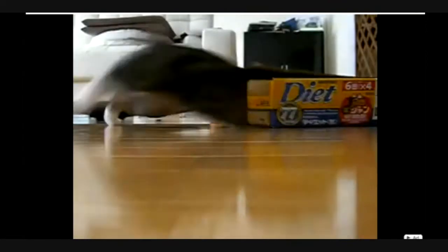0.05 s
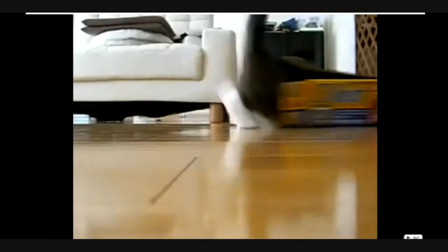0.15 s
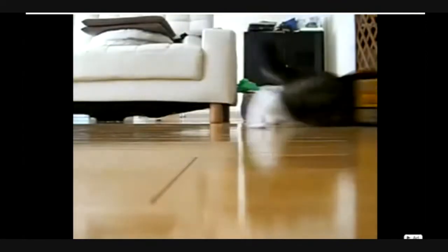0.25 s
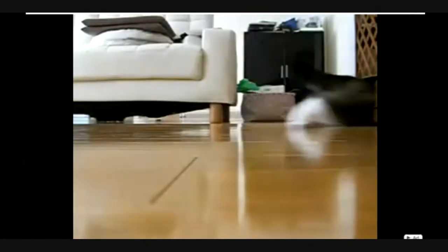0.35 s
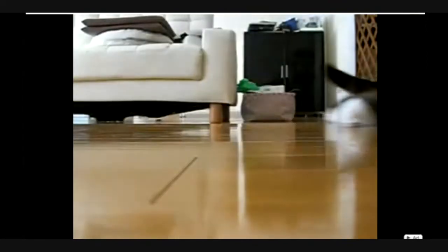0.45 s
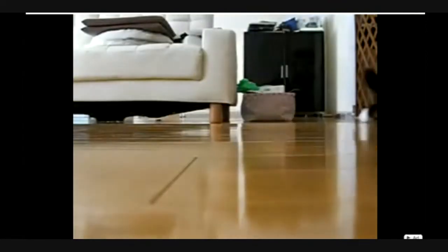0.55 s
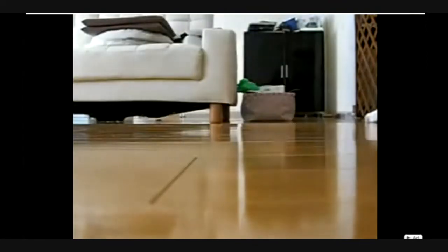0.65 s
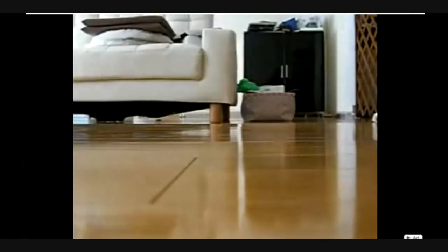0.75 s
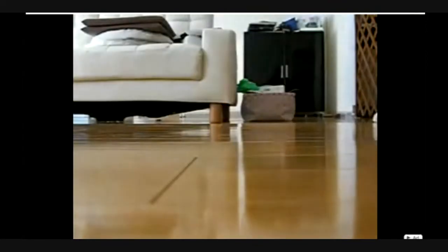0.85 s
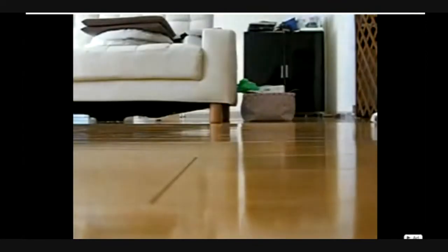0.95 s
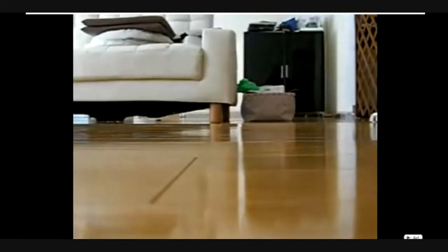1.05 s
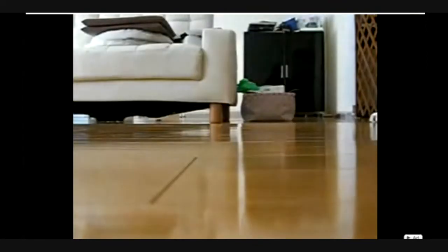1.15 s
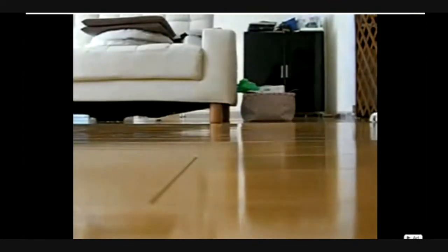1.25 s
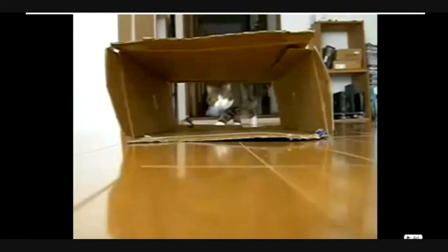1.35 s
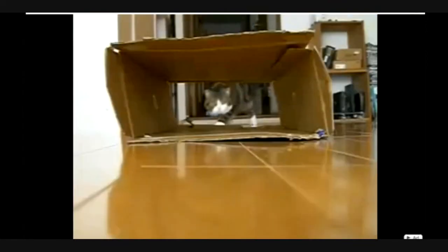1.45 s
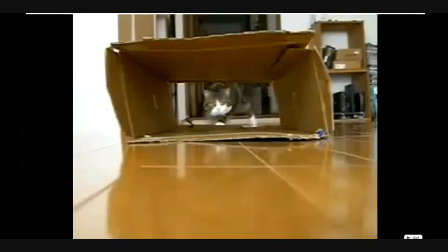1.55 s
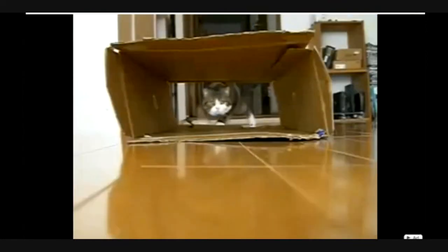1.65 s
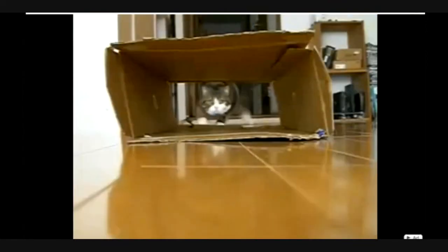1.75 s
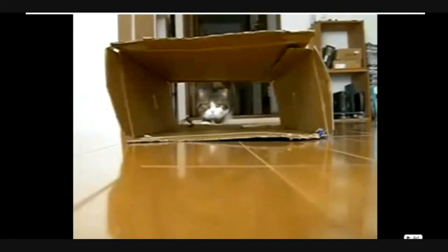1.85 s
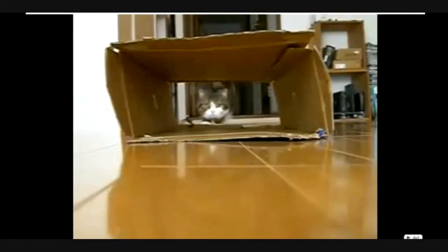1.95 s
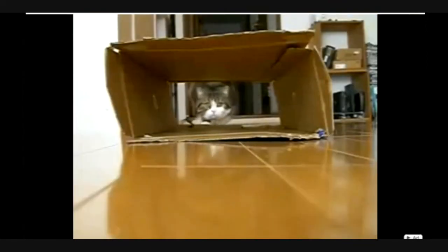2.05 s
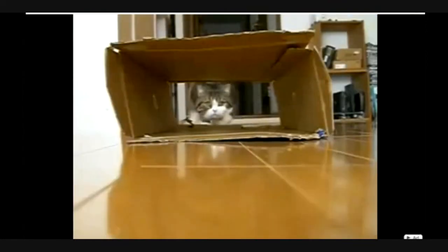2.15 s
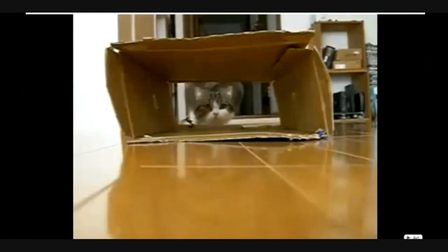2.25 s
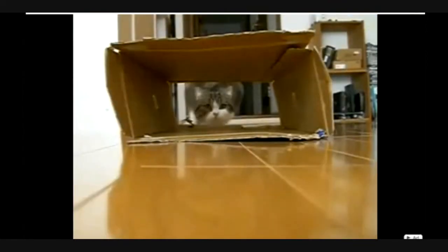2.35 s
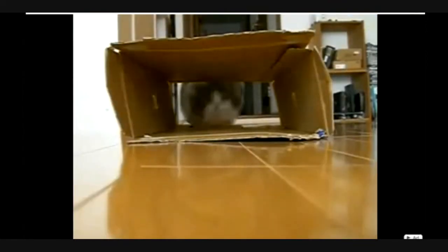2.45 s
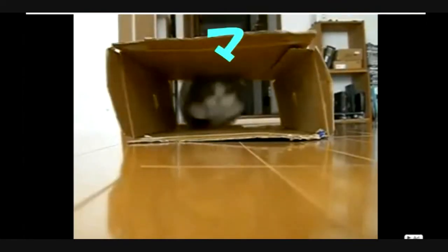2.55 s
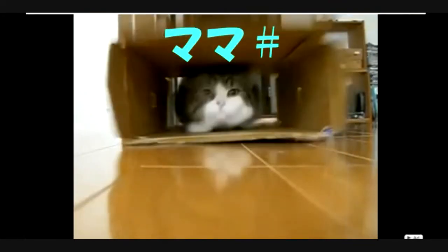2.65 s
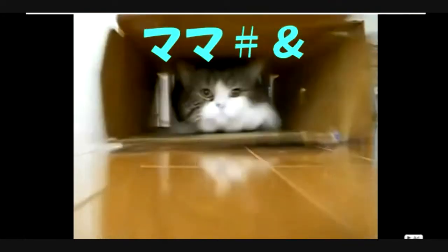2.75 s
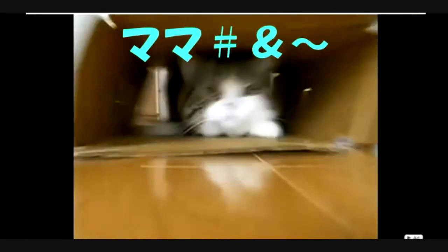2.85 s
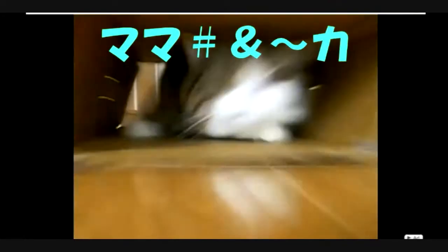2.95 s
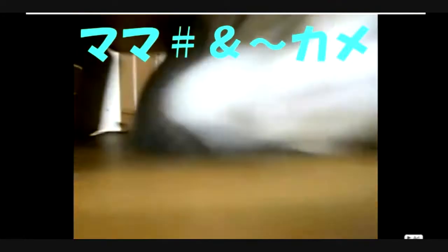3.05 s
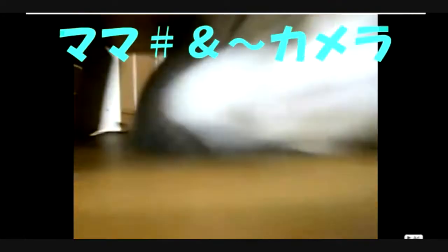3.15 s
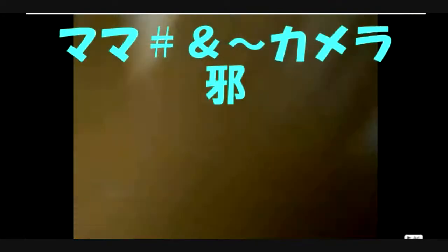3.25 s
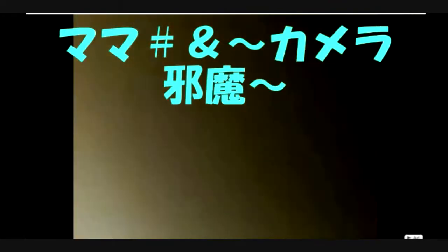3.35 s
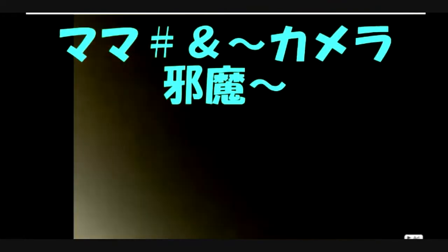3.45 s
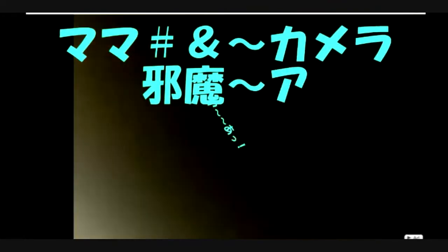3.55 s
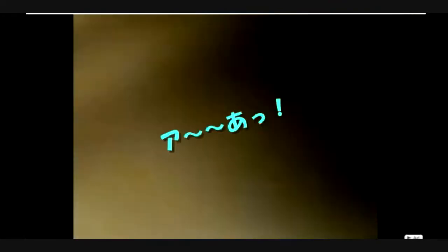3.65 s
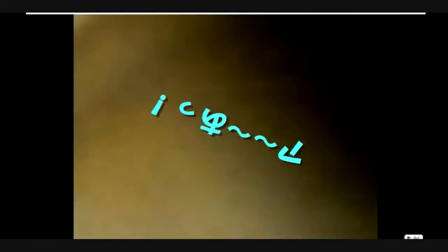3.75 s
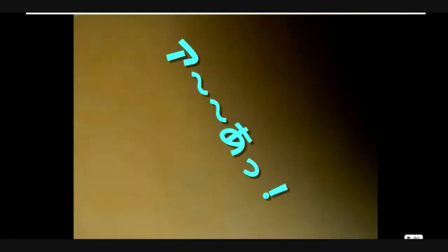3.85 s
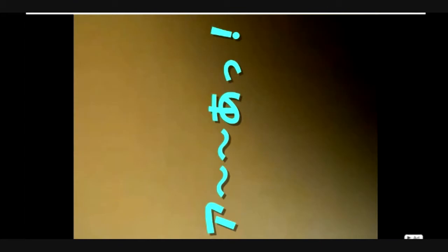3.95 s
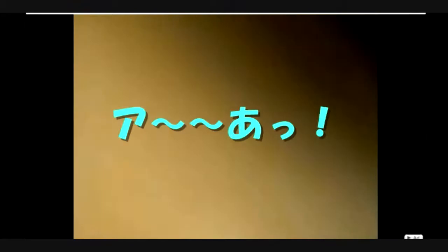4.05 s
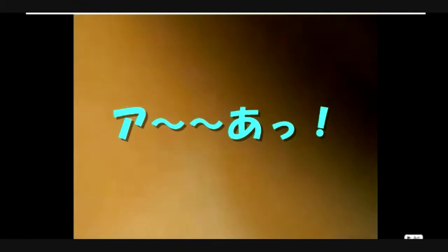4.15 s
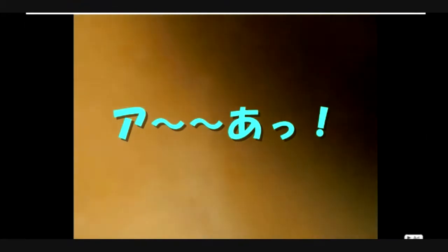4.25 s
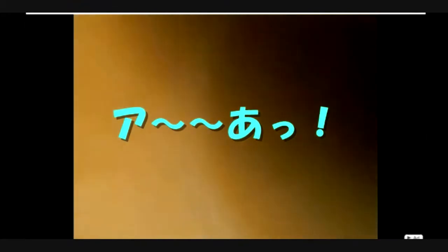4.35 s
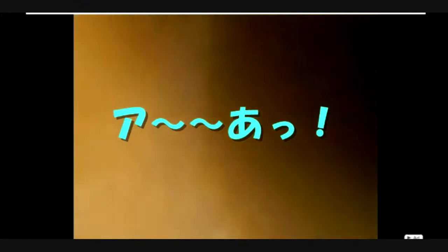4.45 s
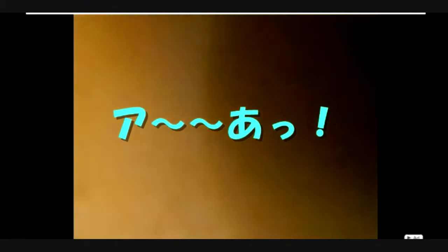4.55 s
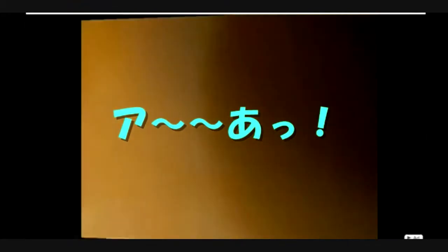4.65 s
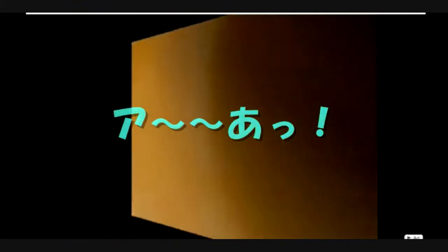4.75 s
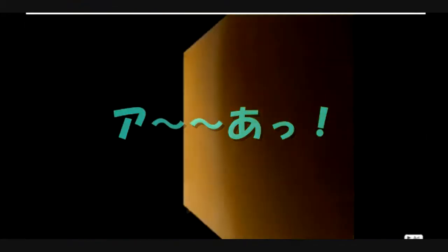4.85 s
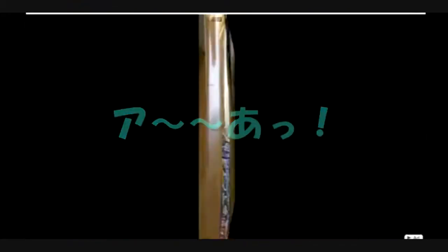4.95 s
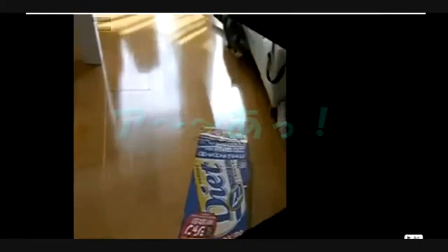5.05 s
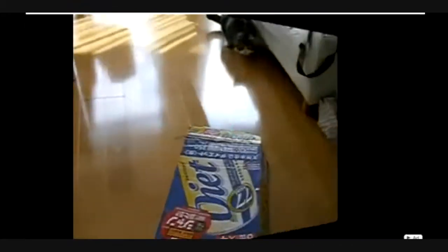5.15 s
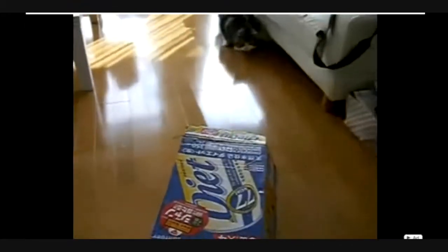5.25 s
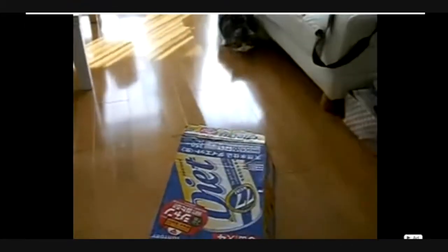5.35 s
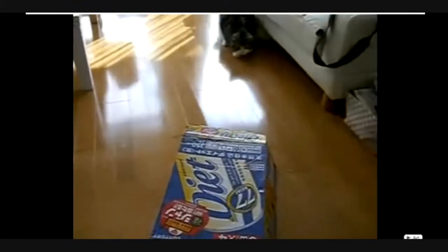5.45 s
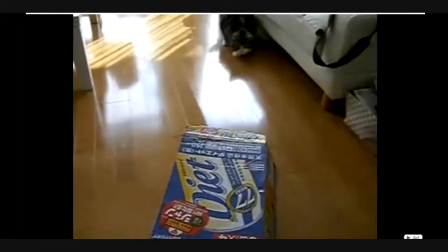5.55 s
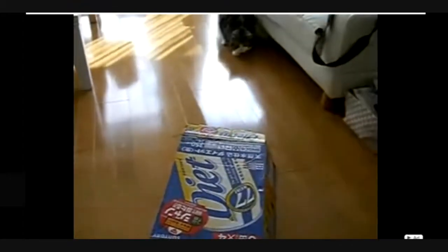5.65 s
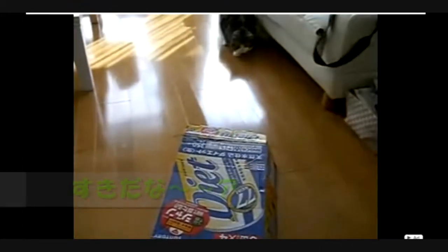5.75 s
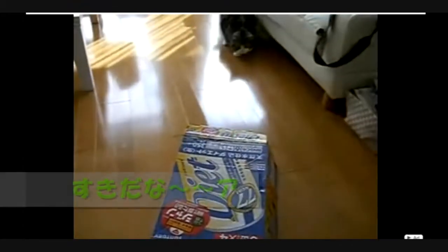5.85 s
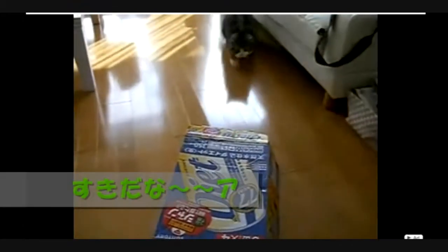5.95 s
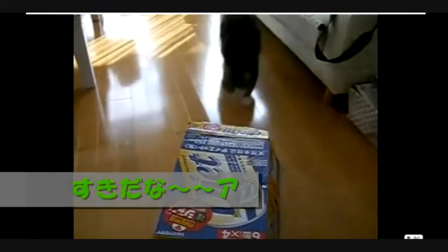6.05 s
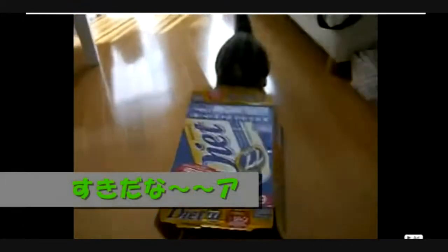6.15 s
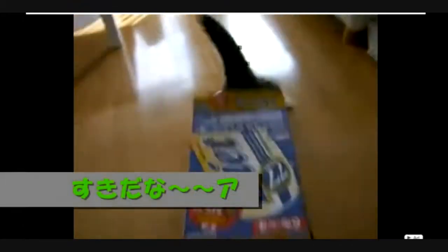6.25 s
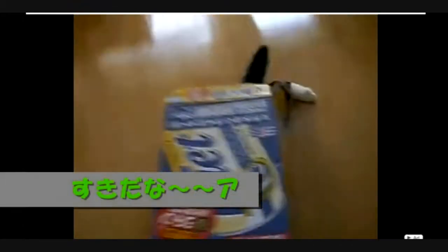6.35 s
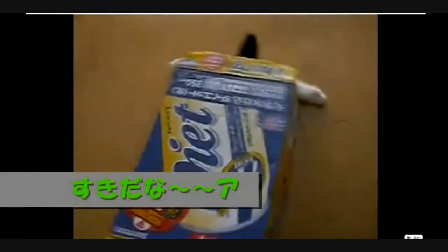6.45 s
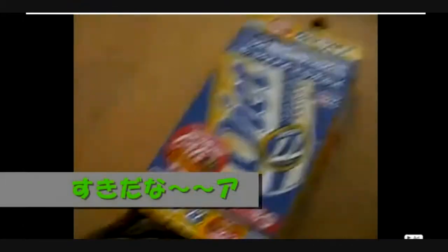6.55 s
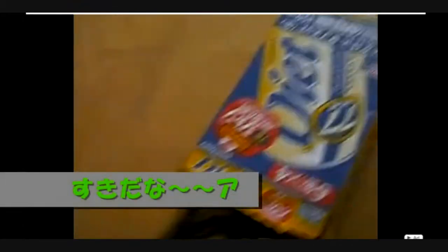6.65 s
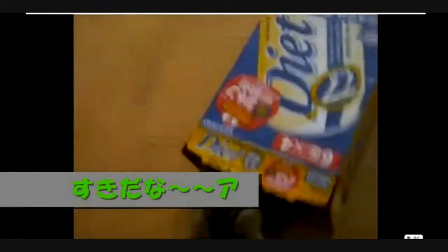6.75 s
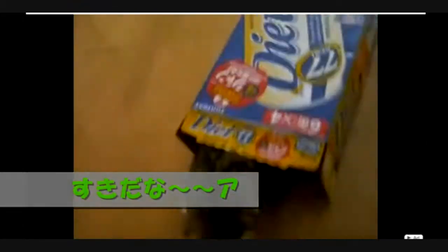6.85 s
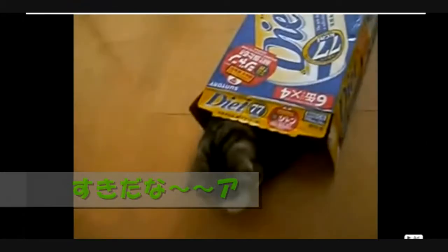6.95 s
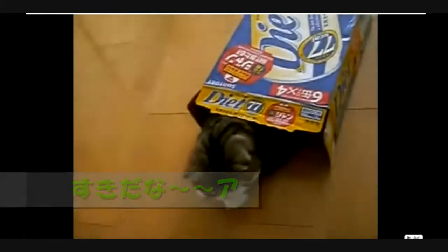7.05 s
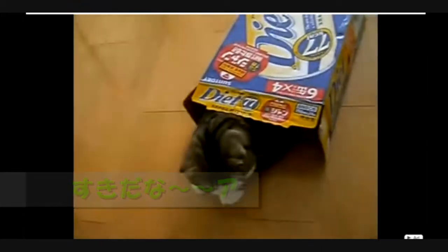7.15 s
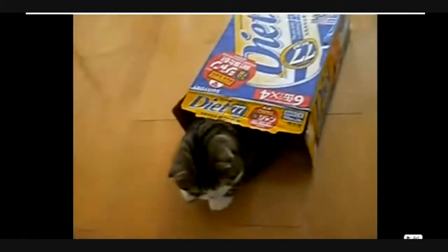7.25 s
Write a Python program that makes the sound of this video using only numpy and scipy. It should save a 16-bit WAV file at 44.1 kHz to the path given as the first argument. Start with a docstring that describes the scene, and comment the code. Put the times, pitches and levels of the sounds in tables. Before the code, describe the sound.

Soft room noise and a thin camera motor whine surround a cat playing with cardboard. First come brief dry carton skids moving off; next, light scuffs and knocks on a big box grow into very close, loud paw thuds, rumble and rasping shoves. It settles into near quiet before a thin carton, farther off in the room, slaps and slides sharply, then rests.

```python
"""A cat plays with boxes on a wooden floor, over room tone at three levels in turn.
First it bolts off in a thin carton: blows and fading surges of skid, grains of friction in filters.
Then it gallops through a big corrugated box and shoves it: damped-sine thuds, resonant knocks, scrapes.
Until late in the shove a lens motor whines and at times ticks: sines and noise bursts.
Last it dives into the carton, which claps and skids to rest; a few soft thuds end it."""
import sys
import numpy as np
from scipy import signal
from scipy.fft import rfft, irfft
from scipy.io import wavfile
from scipy.ndimage import uniform_filter1d

SR = 44100
rng = np.random.default_rng(int(sys.argv[2]) if len(sys.argv) > 2 else 0)


def master_out(mix):
    """Clip the mix to full scale and print it as 16-bit PCM to the path in sys.argv[1]."""
    frames = np.transpose(np.atleast_2d(mix))
    ceiling = np.clip(frames, -1, 1)
    pcm = np.round(ceiling * 32767).astype(np.int16)
    wavfile.write(sys.argv[1], SR, pcm)


N = 322812
T = np.arange(N) / SR
HZ = np.fft.rfftfreq(8192, 1 / SR)  # grid of the filter curves

# treble band goes missing, begins to return; room tone and lens whine change there too: t/s
BAND_TIMES_S = (1.086, 4.6)

# room tone spectrum: f/Hz, relative level/dB
TONE_SPECTRUM = [(15, -65), (25, -18.5), (131, -4.5), (219, -9), (257, -5.5), (373, -6), (415, -7.5),
                 (501, -8.5), (1060, -13.5), (4260, -24.5), (6040, -26.5), (10000, -31.5), (15000, -75)]
# room tone offset before, between and after the band times: level/dB
TONE_OFFSETS_DB = [0, -9.5, 0.5]
TONE_DB = -49.5
DIP_START_S, DIP_LENGTH_S, DIP_DB = 7.118, 0.051, -9.5
# reverberation: f/Hz, t60/s
ROOM_T60 = [(100, 0.3), (500, 0.46), (2000, 0.81), (10000, 0.25)]
# microphone response: f/Hz, relative level/dB
MIC_RESPONSE = [(10, -15), (35, 0.5), (10500, -1), (12300, 0), (13200, -33.5), (15000, -31)]
TOP_EDGE_HZ, NOTCH_DB = 14800, -30

# lens motor whine, before and between the band times: f/Hz, level/dB
WHINE_FIRST = [(9399, -55.5), (7900, -63), (12690, -72)]
WHINE_SECOND = [(3935, -63.5), (7095, -67.5)]
# lens resonances, before and between the band times: f/Hz, width/Hz, relative level/dB
LENS_FIRST = [(7400, 750, 0), (8950, 760, 1), (11300, 790, -27)]
LENS_SECOND = [(4030, 1100, -6), (6760, 780, -9)]
# spells of focusing: start t/s, end t/s, mean step level/dB
FOCUSING = [(.38, 1.06, -53.5), (1.854, 2.34, -53)]
STEP_GAP_S, STEP_JITTER_S, STEP_SPREAD_DB = 0.036, .011, 2
STEP_HALF_LENGTH_S = .016

# sharp click: t/s, level/dB, decay/s
CLICK = (2.911, -6, .0001)

# carton resonances: f/Hz, width/Hz, relative level/dB
CARTON_MODES = [(203, 240, -2), (326, 130, -7), (373, 113, 6.5), (453, 99, 3.5), (622, 100, 3.5),
                (850, 130, 2), (920, 140, -2.5), (1120, 230, -3.5), (1520, 350, -6.5), (2050, 420, -8.5),
                (3230, 1300, -4.5), (4300, 350, -17), (6130, 1700, -3), (9000, 2400, -23)]
# blows on the carton: t/s, level/dB, contact f/Hz
CLAPS = [(.08, -22.5, 448), (.683, -33, 392), (5.843, -32, 714), (5.907, -27, 3060), (5.923, -18.5, 604),
         (5.939, -10, 340), (5.947, -7.5, 477), (5.96, -8, 427), (6.016, -18.5, 420), (6.136, -12, 2720),
         (6.138, -5, 710), (6.168, -16.5, 1400), (6.263, -9.5, 635), (6.268, -20.5, 253),
         (6.314, -25.5, 3200), (7.286, -26.5, 605)]
# carton skid in each bound of the fleeing cat: t/s, hold/s, hiss level/dB
BOUNDS = [(0, 0.058, -31.5), (0.212, 0.12, -45.5), (0.502, 0.091, -53), (0.766, 0.074, -57.5)]
BOUND_ATTACK_S, BOUND_RELEASE_S = 0.021, 0.1
BOLT_DRUM_DB = 6  # re hiss
# panel drumming and card hiss in the bolt: f/Hz, relative level/dB
DRUM_AWAY = [(20, -6), (60, -8.5), (150, -1), (310, -2.5), (560, -6), (750, -16.5), (1200, -18),
             (2000, -32), (4000, -54)]
HISS_AWAY = [(700, -20), (1500, -0.5), (2000, -2.5), (2400, -6), (3200, 2), (3900, -3.5), (4300, -2),
             (6000, -5), (8500, -10), (10000, -18), (12500, -44), (16000, -53)]
# skid after the dive: t/s, panel drumming level/dB, card hiss level/dB
DIVE_SKID = [(5.82, -61, -68), (5.92, -36.5, -40.5), (5.98, -24, -31), (6.02, -37, -28.5),
             (6.07, -40.5, -38), (6.12, -34, -33.5), (6.2, -40, -39), (6.26, -41, -37.5),
             (6.38, -47, -48.5), (6.5, -54, -70)]
# card hiss in the dive: f/Hz, relative level/dB
HISS_DIVE = [(700, -15), (1100, 10.5), (1800, -5.5), (3000, 2), (3900, 2), (4250, 8), (4700, -16),
             (5200, 3), (6400, 4.5), (8000, -3), (8900, -2.5), (10500, -10.5), (12200, -24), (13200, -45)]

# soft paws and body landing: t/s, level/dB, f/Hz
THUDS = [(0.051, -24.5, 150), (0.33, -27, 142), (1.401, -28, 83.6), (2.343, -21.5, 144), (2.467, -9.5, 107),
         (2.494, -1.5, 114), (2.637, -7, 95.5), (2.667, -5, 112), (2.894, -4.5, 113), (2.974, -5, 107),
         (3.044, -0.5, 90), (3.266, -12.5, 164), (3.702, -2, 144), (3.866, 0.5, 129), (3.894, -5.5, 145),
         (3.913, -7, 80), (3.939, -4, 142), (4.41, -5, 219), (4.549, -12, 169), (7.178, -31, 135),
         (7.197, -26, 165), (7.227, -35, 124)]
# big box resonances: f/Hz, width/Hz, relative level/dB
BOX_MODES = [(131, 72, 3), (222, 90, 10.5), (394, 140, 5), (661, 213, -2.5), (1000, 250, -7.5),
             (1305, 62, -5.5), (1506, 400, -4.5), (1790, 135, -30), (2140, 140, -10.5), (2557, 330, -13.5),
             (3105, 750, -13.5), (4125, 690, -16), (6930, 1230, -20), (9040, 1820, -16)]
# claws and edges knocking the big box: t/s, level/dB, contact f/Hz
KNOCKS = [(1.088, -28.5, 900), (1.339, -8, 790), (1.461, -23, 1400), (1.669, -17.5, 1460),
          (1.702, -24.5, 900), (2.464, -19.5, 1810), (2.637, -17, 3000), (2.668, -13, 1700),
          (3.044, -3.5, 700), (3.078, -17, 2000), (3.186, -10.5, 890), (3.25, -13, 900), (3.702, -3, 650),
          (3.754, -6.5, 580), (3.865, 2.5, 890), (3.894, -4, 330), (3.941, -14, 1300), (3.947, -6, 1870),
          (3.977, -10, 600), (4.412, -10.5, 380), (4.446, -11.5, 1100), (4.553, -12.5, 900)]
# time scale of a 0 dB blow; weaker blows last longer
THUD_CONTACT_S, KNOCK_CONTACT_S, CLAP_CONTACT_S, SOFTENING = 0.0026, .002, 0.0033, 0.25

# air in the box's tunnel: f/Hz, width/Hz, relative level/dB
TUNNEL_MODES = [(587, 340, 2.5), (1040, 330, -1.5), (1400, 250, -2.5), (1730, 170, -11), (2100, 160, -9)]
SCUFF_START_S, SCUFF_LENGTH_S, SCUFF_DB, SCUFF_SWELL_DB = 1.245, .142, -34.5, 7.5
SCUFF_ATTACK_S, SCUFF_RELEASE_S = .005, 0.0093
SCUFF_BRIGHT_DB = -8  # share straight through the card

# hollows where reflections cancel in the big box: f/Hz, width/Hz, gain/dB
HOLLOWS = [(1187, 52, -10), (1985, 57, -3), (2360, 78, 0), (3540, 170, -0.5)]
# four moves of the big box: t/s, rumble under the weight level/dB, edge rasp level/dB
CREEP = [(1.086, -42, -46), (1.2, -40, -50.5), (1.41, -35.5, -43), (1.5, -42, -53), (1.58, -35, -47.5),
         (1.73, -40.5, -46.5), (1.85, -49, -59.5), (2.33, -46.5, -63.5)]
GALLOP = [(2.33, -39, -62), (2.44, -33.5, -41.5), (2.51, -16.5, -37.5), (2.61, -25.5, -36),
          (2.7, -20, -27.5), (2.82, -22.5, -23.5), (2.92, -16, -22), (3.04, -14, -18.5),
          (3.058, -16.5, -37.5), (3.12, -17, -32), (3.17, -36, -34.5)]
SLIDE = [(3.17, -30, -35), (3.235, -34, -33.5), (3.27, -22.5, -30.5), (3.32, -28.5, -31.5),
         (3.44, -29, -30), (3.6, -18, -35.5), (3.66, -23.5, -35), (3.7, -16.5, -32.5), (3.74, -37, -47)]
PUSH = [(3.74, -33, -40), (3.83, -21.5, -30.5), (3.98, -22.5, -36), (4.14, -29, -35), (4.25, -19, -34.5),
        (4.44, -20, -33), (4.62, -27, -42.5), (4.75, -29, -57), (4.87, -45.5, -63), (5.0, -60, -75)]
# contact per move: curve, wall flexing/dB, edge ring/dB, rumble f/Hz, wall f/Hz, edge f/Hz
MOVES = [(CREEP, -4.5, 5, 174, 740, 660), (GALLOP, -8.5, 1.4, 106, 1200, 2020),
         (SLIDE, -4, 1.6, 115, 840, 2430), (PUSH, -1.6, 0, 150, 570, 1360)]
# lumpy rumble: f/Hz, relative level/dB
RUMBLE_SPECTRUM = [(15, -39), (35, -2.5), (70, -4.5), (115, -3), (165, -5), (250, -4.5), (340, -7.5),
                   (600, -50)]
WALL_LOAD_SHARE = 0.65  # wall drive from weight; the rest from sliding
WANDER_OCTAVES, WANDER_HZ = 0.29, 7


def amp(db):
    """Decibels to gain."""
    return 10 ** (np.asarray(db) / 20)


def evened(x):
    """Scales to an rms of 1."""
    return x / np.sqrt(np.mean(x ** 2) + 1e-20)


def steadied(x, span_s=0.14):
    """Holds the slow level at 1, leaves the fine grain."""
    power = abs(uniform_filter1d(x ** 2, int(span_s * SR)))
    return x / np.sqrt(power + 1e-12)


def read(points, hz):
    """Reads a table on a log-frequency axis."""
    f, value = np.transpose(points)
    return np.interp(np.log(hz + 1), np.log(f), value)


def levels(rows):
    """One gain curve per dB column, silent outside the rows."""
    s, *columns = np.transpose(rows)
    return [amp(np.interp(T, s, c, left=-120, right=-120)) for c in columns]


def add(mix, s, sound):
    """Mixes a sound in at time s."""
    part = mix[max(round(s * SR), 0):][:len(sound)]
    part += sound[:len(part)]


def drift(rate_hz):
    """Slow random curve with an rms of 1."""
    lowpass = np.exp(-(np.fft.rfftfreq(N, 1 / SR) / rate_hz) ** 2)
    return evened(irfft(rfft(rng.standard_normal(N)) * lowpass, N))


def stroke(start_s, length_s, attack_s, release_s):
    """Attack, hold and release of one rub."""
    t = np.maximum(T - start_s, 0)
    return np.minimum(t / attack_s, 1) * np.exp(-np.maximum(t - length_s, 0) / release_s)


def peaks(modes):
    """Gain over frequency of a set of resonances."""
    power = 0
    for hz, width, db in modes:
        power = power + amp(db) ** 2 / (1 + ((HZ - hz) / (0.79 * width)) ** 2) ** 2
    return np.sqrt(power)


def below(hz, order):
    """Gain of a low-pass."""
    return 1 / np.sqrt(1 + (HZ / hz) ** (2 * order))


def colour(x, gain):
    """Minimum-phase filter, gain scaled to a maximum of 1: rings after a click, never before."""
    log_gain = np.log(np.maximum(gain / gain.max(), 1e-5))
    circle = np.concatenate([log_gain, log_gain[-2:0:-1]])
    taps = np.fft.ifft(np.exp(np.conj(signal.hilbert(circle)))).real
    return signal.oaconvolve(x, taps[:len(HZ) // 2])[:len(x)]


def resonate(x, hz, width):
    """A resonance of gain 1 that follows the curve hz."""
    turn = np.exp(2j * np.pi * np.cumsum(hz) / SR)
    r = np.exp(-np.pi * width / SR)
    return 2 * (turn * signal.lfilter([1 - r], [1, -r], x / turn)).real


def friction(catches_per_s, spread_db, smooth, judder_db, judder_hz):
    """Fibres catch and let go as uneven clicks over a smooth rub; the contact pressure judders."""
    sizes = amp(spread_db * np.minimum(rng.exponential(1, N), 4))
    catches = sizes * rng.choice([-1, 1], N) * (rng.random(N) < catches_per_s / SR)
    rub = smooth * rng.standard_normal(N)
    return (evened(catches) + rub) * amp(judder_db * drift(judder_hz))


def contact_time(db, contact_0db_s):
    """The harder the blow, the shorter the contact."""
    return contact_0db_s * amp(-SOFTENING * db)


def blows(rows, body, contact_0db_s, push, focus, rebound_s, rebound_db, graze_s, graze_db):
    """Card grazes, is pushed home, rattles, rebounds; the body rings most near the contact pitch."""
    lead = SR // 40  # room for the graze ahead of the blow
    out, t = np.zeros(N), np.arange(-lead, SR // 5) / SR
    for s, db, hz in rows:
        rattle_s = contact_time(db, contact_0db_s)
        first = np.maximum(t, 0) / rattle_s
        second = np.maximum(t - rebound_s, 0) / (2 * rattle_s)
        graze = amp(graze_db) * np.exp(-abs(t) / graze_s)
        rattle = np.sqrt(first) * np.exp(-first)
        rebound = amp(rebound_db) * np.sqrt(second) * np.exp(-second)
        force = rng.standard_normal(len(t)) * (graze + rattle + rebound)
        force /= np.linalg.norm(force)
        force[lead] += push * np.exp(-rattle_s / 0.006)
        near_contact = (HZ * hz / (HZ ** 2 + hz ** 2)) ** focus
        sound = colour(force, body * near_contact)
        add(out, s - lead / SR, amp(db) * sound / abs(sound).max())
    return out


def room(x):
    """Sparse random reflections of a furnished room, each band dying at its own speed."""
    taps = rng.choice([-1., 1.], SR // 2) * (rng.random(SR // 2) < 2500 / SR)
    taps *= T[:SR // 2] > .006
    hz, t, z = signal.stft(taps, SR, nperseg=256)
    decay = amp(-60 * t / read(ROOM_T60, hz)[:, None])
    tail = signal.istft(z * decay, SR, nperseg=256)[1]
    return signal.oaconvolve(x, tail / np.linalg.norm(tail))[:N]


def room_tone():
    """Soft coloured noise, its level stepping at the band times; dips briefly near the end."""
    dip = (T > DIP_START_S) & (T < DIP_START_S + DIP_LENGTH_S)
    stretch = np.searchsorted(BAND_TIMES_S, T)
    db = TONE_DB + np.array(TONE_OFFSETS_DB)[stretch] + DIP_DB * dip
    return amp(db) * evened(colour(rng.standard_normal(N), amp(read(TONE_SPECTRUM, HZ))))


def focus_steps():
    """Envelope of short lens pushes at a loose, even pace."""
    steps = np.zeros(N)
    window = np.hanning(round(2 * STEP_HALF_LENGTH_S * SR))
    for start, end, db in FOCUSING:
        for k, (late, strong) in enumerate(rng.standard_normal(size=(24, 2))):
            s = start + k * STEP_GAP_S + STEP_JITTER_S * late
            if s < end:
                add(steps, s - STEP_HALF_LENGTH_S, amp(db + STEP_SPREAD_DB * strong) * window)
    return steps


def lens_motor():
    """Whine of sines with wavering phase, and a short resonant rasp per focus step."""
    steps, out = focus_steps(), np.zeros(N)
    missing_s, return_s = BAND_TIMES_S
    before, between = T < missing_s, (T >= missing_s) & (T < return_s)
    for stretch, whine, modes in [(before, WHINE_FIRST, LENS_FIRST),
                                  (between, WHINE_SECOND, LENS_SECOND)]:
        waver = np.cumsum(rng.standard_normal(N)) * 0.029
        lines = sum(np.sqrt(2) * amp(db) * np.sin(2 * np.pi * hz * T + waver) for hz, db in whine)
        rasp = steps * evened(colour(rng.standard_normal(N), peaks(modes)))
        out += stretch * (lines + rasp)
    return out


def click():
    """One very short, full-band tick."""
    s, db, decay_s = CLICK
    out = np.zeros(N)
    add(out, s, amp(db) * np.exp(-T[:SR // 100] / decay_s))
    return out


def carton_skid(drum, hiss, panels, hiss_colour):
    """Thin card slides on varnish: coarse slips drum its panels, fine ones hiss."""
    slips = friction(catches_per_s=600, spread_db=-1.0, smooth=0.75, judder_db=-1.5, judder_hz=50)
    fibres = friction(catches_per_s=2000, spread_db=2.0, smooth=0.56, judder_db=2.0, judder_hz=60.6)
    drumming = drum * steadied(colour(slips, panels))
    hissing = hiss * steadied(colour(fibres, amp(read(hiss_colour, HZ))))
    return drumming + hissing


def bolt():
    """The carton skids away in weakening surges, one per bound."""
    hiss = 0
    for s, length_s, db in BOUNDS:
        hiss = hiss + amp(db) * stroke(s - BOUND_ATTACK_S, length_s, BOUND_ATTACK_S, BOUND_RELEASE_S)
    return carton_skid(amp(BOLT_DRUM_DB) * hiss, hiss, amp(read(DRUM_AWAY, HZ)), HISS_AWAY)


def dive():
    """The cat's dive drives the carton across the floor until it comes to rest."""
    drum, hiss = levels(DIVE_SKID)
    return carton_skid(drum, hiss, peaks(CARTON_MODES) * below(1100, order=2), HISS_DIVE)


def carton_claps():
    """Blows on thin card, with a late, strong rebound."""
    return blows(CLAPS, peaks(CARTON_MODES) * below(11000, order=8), CLAP_CONTACT_S, push=0.9,
                 focus=1.7, rebound_s=0.015, rebound_db=-10, graze_s=0.0055, graze_db=-12.5)


def paw_scuff():
    """Claws scuff the far end of the box, bear down and let go, heard down the tunnel."""
    claws = friction(catches_per_s=810, spread_db=2.0, smooth=0.58, judder_db=2.5, judder_hz=90)
    progress = np.clip((T - SCUFF_START_S) / SCUFF_LENGTH_S, 0, 1)
    pressure = amp(SCUFF_DB + SCUFF_SWELL_DB * progress)
    touch = stroke(SCUFF_START_S, SCUFF_LENGTH_S, SCUFF_ATTACK_S, SCUFF_RELEASE_S)
    direct = amp(SCUFF_BRIGHT_DB) * peaks(BOX_MODES) * (1 - below(1270, order=2))
    return pressure * touch * steadied(colour(claws, peaks(TUNNEL_MODES) + direct), span_s=0.038)


def thuds():
    """Padded weight lands: each thud a sine that swells and dies within its contact time scale."""
    out, t = np.zeros(N), np.arange(SR // 8) / SR
    for s, db, hz in THUDS:
        swell = t / contact_time(db, THUD_CONTACT_S)
        add(out, s, amp(db) * swell * np.exp(1 - swell) * np.sin(2 * np.pi * hz * t))
    return out


def box_knocks():
    """Claws and edges strike corrugated card, with a quick, weak rebound."""
    return blows(KNOCKS, peaks(BOX_MODES) * below(11000, order=8), KNOCK_CONTACT_S, push=0.63,
                 focus=0.73, rebound_s=0.0063, rebound_db=-15.5, graze_s=0.0025, graze_db=-21.5)


def hollowed(x):
    """Cuts the narrow hollows out of a sound."""
    return colour(x, amp(sum(db / (1 + (2 * (HZ - hz) / width) ** 2) for hz, width, db in HOLLOWS)))


def box_motion():
    """Gains of rumble, walls and edges over all moves, and the contact of the current move."""
    gains, contact = np.zeros((3, N)), np.zeros((4, N))
    for curve, wall_db, *settings in MOVES:
        weight, rasp = levels(curve)
        walls = amp(wall_db) * weight ** WALL_LOAD_SHARE * rasp ** (1 - WALL_LOAD_SHARE)
        gains += [weight, walls, rasp]
        contact[:, T >= curve[0][0]] = np.array(settings)[:, None]
    return gains, contact


def big_box():
    """Lumpy rumble under weight, stick-slip in the walls, fine rasp at the edges; wall and edge pitch wander."""
    (weight, flex, rasp), (ring_db, rumble_hz, wall_hz, edge_hz) = box_motion()
    shift = 2 ** (WANDER_OCTAVES * drift(WANDER_HZ))  # the contact shifts about
    lumps = friction(catches_per_s=350, spread_db=1.5, smooth=0.98, judder_db=1.0, judder_hz=30)
    slips = friction(catches_per_s=700, spread_db=2.5, smooth=0.53, judder_db=2.5, judder_hz=50)
    fibres = friction(catches_per_s=2500, spread_db=-0.5, smooth=0.49, judder_db=1.9, judder_hz=70.0)
    lumps = 0.48 * lumps + resonate(lumps, rumble_hz, width=88)
    slips = 1.4 * slips + resonate(slips, wall_hz * shift, width=480)
    fibres = 0.67 * fibres + amp(ring_db) * resonate(fibres, edge_hz * shift, width=900)
    walls = below(1330, order=6)
    wall_gain = peaks(BOX_MODES) * walls * (1 - below(314, order=3))
    edge_gain = peaks(BOX_MODES) * (1 - walls) * below(8930, order=10)
    rumble = weight * steadied(colour(lumps, amp(read(RUMBLE_SPECTRUM, HZ))))
    groan = flex * steadied(colour(slips, wall_gain))
    scrape = rasp * steadied(colour(fibres, edge_gain))
    return amp(-1) * rumble + amp(0.5) * groan + scrape


def scene():
    """Big box close to the microphone, carton farther out in the room, lens motor, room tone."""
    box = hollowed(big_box() + box_knocks()) + thuds() + paw_scuff()
    carton = carton_claps() + bolt() + dive()
    near = box + amp(-22.0) * room(box)
    far = carton + amp(-12.0) * room(carton)
    return (near + far + lens_motor() + room_tone())[None]


def record(dry):
    """Microphone response, soft saturation, a treble band missing for a while, a click, a top edge."""
    x = colour(dry[0], amp(read(MIC_RESPONSE, HZ)))
    x = x / (1 + (x / .92) ** 8) ** (1 / 8)
    notch = signal.firwin(601, [4800, 6230], window=("kaiser", 5), fs=SR)  # band-stop
    missing_s, return_s = BAND_TIMES_S
    shut = np.interp(T, [missing_s, missing_s + .005, return_s, return_s + .15], [0, 1, 1, 0])
    shut = shut * (1 - amp(NOTCH_DB))
    x = shut * signal.oaconvolve(x, notch, "same") + (1 - shut) * x + click()
    top_edge = signal.firwin(511, TOP_EDGE_HZ, window=("kaiser", 9), fs=SR)
    return signal.oaconvolve(x, top_edge, "same")[None]


dry = scene()
out = record(dry)
master_out(out)
```